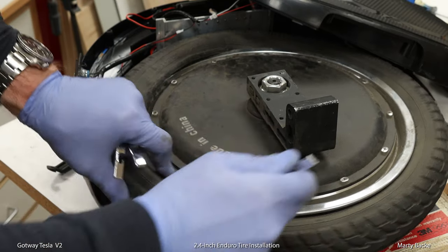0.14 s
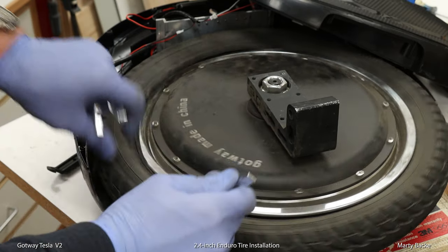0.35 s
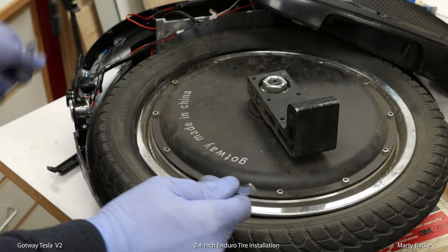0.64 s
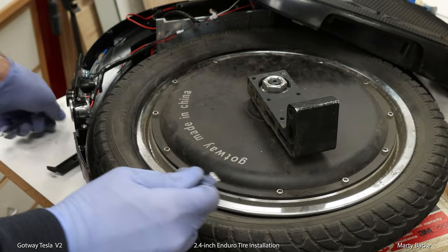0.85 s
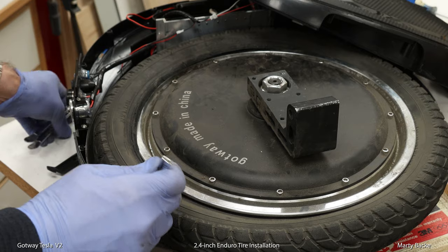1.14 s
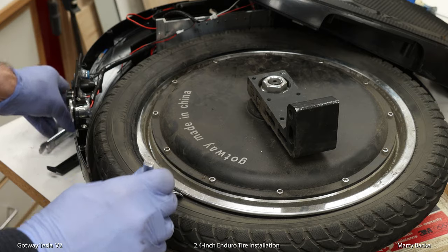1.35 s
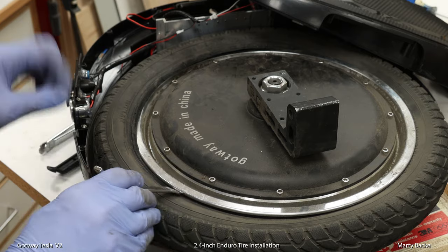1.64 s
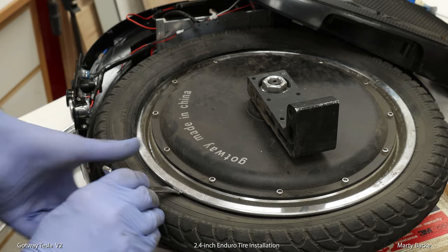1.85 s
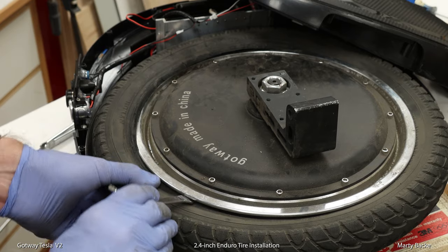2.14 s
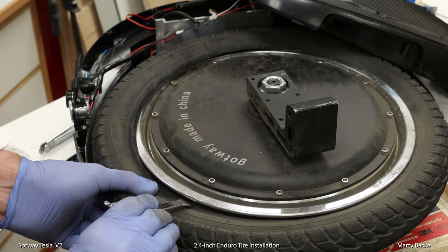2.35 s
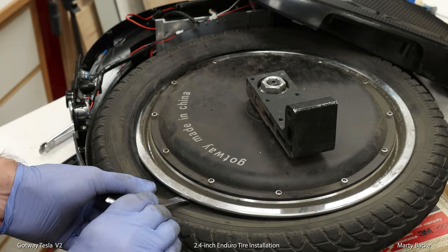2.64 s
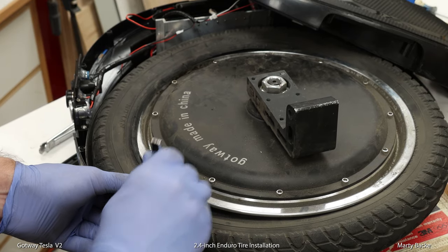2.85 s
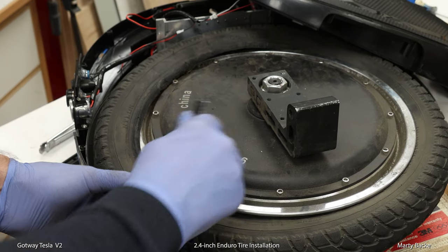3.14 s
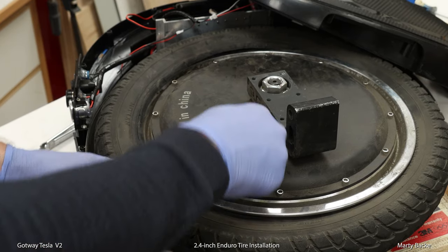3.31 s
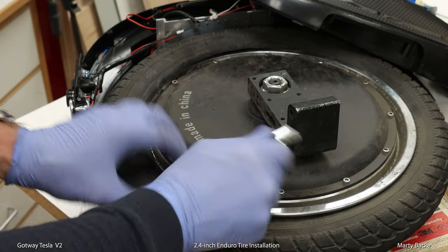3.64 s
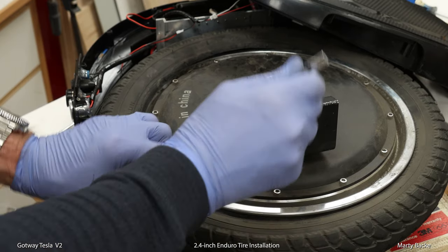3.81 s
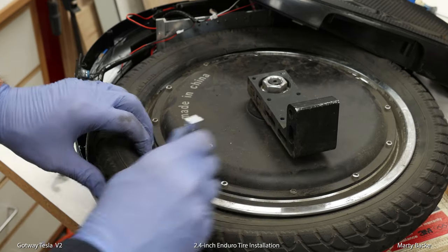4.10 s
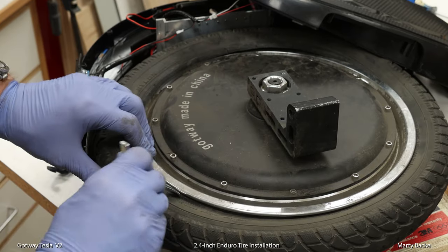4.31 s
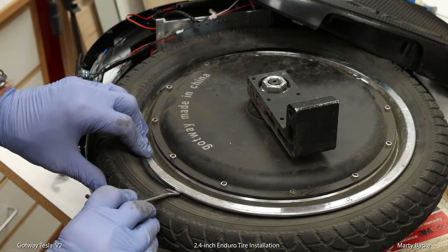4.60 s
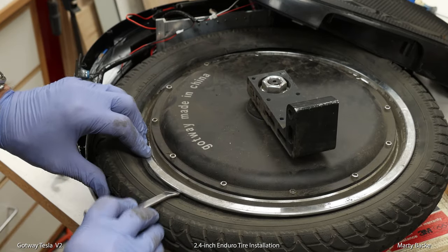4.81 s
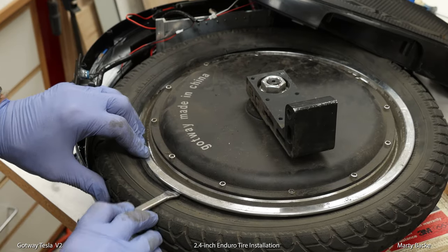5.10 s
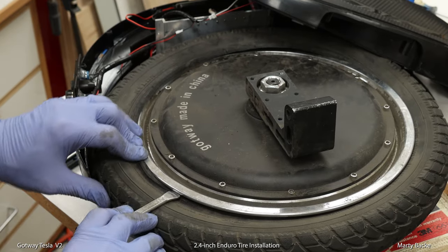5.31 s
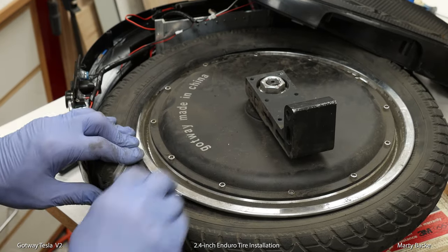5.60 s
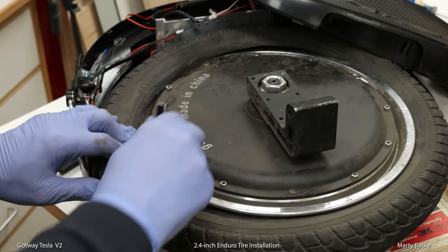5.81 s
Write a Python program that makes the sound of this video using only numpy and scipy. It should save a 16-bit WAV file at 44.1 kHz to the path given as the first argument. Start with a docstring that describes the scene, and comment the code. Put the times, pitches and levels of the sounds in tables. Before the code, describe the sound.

Gloved hands pry a tyre with rubbery creaks and hollow knocks, as metal levers clatter and clink against the rim.

```python
"""A brief rub, a creak and a hollow knock come first: gloved hands pry a tyre off a metal rim on a bench.
Stick-slip friction drives the rubber, glove creases crackle, and the air in the tyre resonates.
Loose steel levers clink, then slide and drop on the board; later a lever strikes the rim. Each impact
excites damped normal modes. The small room hums faintly and reverberates, and slow air pressure
rocks the one close microphone."""
import sys
import numpy as np
from scipy import signal
from scipy.fft import rfft, irfft
from scipy.io import wavfile
from scipy.ndimage import uniform_filter1d

SR = 44100
rng = np.random.default_rng(int(sys.argv[2]) if len(sys.argv) > 2 else 0)


def unload_audio(sound):
    """Save the sound as a 16-bit wav file, at the path given as the first command line argument."""
    columns = np.transpose(np.atleast_2d(sound))
    # keep every value between -1 and 1, then stretch to whole-number steps
    steps = np.round(np.clip(columns, -1, 1) * 32767)
    wavfile.write(sys.argv[1], SR, steps.astype(np.int16))


N = 262836


def undb(db):
    """Amplitude ratio of a level in decibels."""
    return 10 ** (np.asarray(db, float) / 20)


def unit(x):
    """Normalisation to rms 1."""
    return x / np.sqrt(np.mean(x ** 2))


def add(out, s, sound):
    """Superposition: a sound joins the mix at s seconds."""
    i = int(s * SR)
    out[i:i + len(sound)] += sound[:N - i]


def curve(points):
    """Smoothed envelope through (t/s, level/dB) points, silent outside their span."""
    s, db = np.transpose(points)
    return uniform_filter1d(undb(np.interp(np.arange(N) / SR, s, db, -200, -200)), size=200)


def band(x, hz, width_hz):
    """Second-order resonance with unit gain at its centre."""
    q = max(hz / width_hz, .3)
    return signal.lfilter(*signal.iirpeak(min(hz, .45 * SR), q, SR), x)


def steep(x, hz, width_hz):
    """Two equal resonances in cascade: the slopes double."""
    return band(band(x, hz, width_hz), hz, width_hz)


def body(x, peaks):
    """Forced response of a body: a sum of resonances, neighbours in opposite phase."""
    return sum((-1) ** k * undb(db) * band(x, hz, width) for k, (hz, width, db) in enumerate(peaks))


def burst(t60, hz, width_hz, rise_s=0.00085):
    """Transient of band noise: linear rise, exponential decay."""
    t = np.arange(SR // 5) / SR
    noise = unit(steep(rng.standard_normal(len(t)), hz, width_hz))
    return noise * 1000. ** (-t / t60) * np.minimum(t / rise_s, 1)


def stick_slip(rough_db, smear_s):
    """Stick-slip friction: noise in which a few slips are far stronger than the rest."""
    size = undb(rough_db * rng.exponential(1, N // 64 + 1)).repeat(64)[:N]
    return unit(rng.standard_normal(N) * uniform_filter1d(size, int(smear_s * SR)))


def ring(modes, blows, contact_s, scatter_db, rough):
    """Modal response to blows, each partly in step with the mode and partly (share: rough) chatter."""
    t = np.arange(int(contact_s * SR)) / SR
    fade = 1000. ** (-t / contact_s)
    out = np.zeros(N)
    for hz, db, t60, group in modes:
        force = np.zeros(N)
        for s, *blow_db in blows:
            spot, phase = rng.standard_normal(2)  # where a blow lands decides how much a mode gets
            in_step = 2 * np.cos(2 * np.pi * (hz * t + phase)) / np.sum(fade)
            chatter = rng.standard_normal(len(t)) / np.sqrt(np.sum(fade ** 2))
            contact = np.sqrt(1 - rough) * in_step + np.sqrt(rough) * chatter
            add(force, s, undb(db + blow_db[group] + scatter_db * spot) * fade * contact)
        pole = np.exp(2j * np.pi * hz / SR - np.log(1000) / (t60 * SR))
        out += signal.lfilter([1], [1, -pole], force).imag
    return out


def air():
    """Ambient noise: steady room tone and an infrasonic sway of pressure."""
    # spectrum of the room tone: f/Hz, relative density/dB
    spectrum = [(30, -10), (55, 4), (90, -7.5), (200, -7.5), (400, -9), (800, -20), (2000, -27),
                (4000, -31.5), (8000, -35), (16300, -38)]
    # air pressure on the microphone: t/s, level/dB
    sway_levels = [(0.0, -44), (0.13, -39), (0.25, -48), (0.36, -25.5), (0.61, -48), (0.76, -33.5),
                   (0.86, -42.5), (0.93, -41), (0.96, -45), (2.02, -43.5), (2.19, -34.5), (2.31, -44),
                   (5.94, -46), (5.96, -52)]
    bin_hz = np.arange(N // 2 + 1) * SR / N + 1
    hz, db = np.transpose(spectrum)
    shape = undb(np.interp(np.log(bin_hz), np.log(hz), db))
    tone = irfft(rfft(rng.standard_normal(N)) * shape, N)
    sway = unit(steep(rng.standard_normal(N), hz=10, width_hz=15.1))
    return undb(-56) * unit(tone) + curve(sway_levels) * sway


def rubbing():
    """Friction shakes the tyre carcass, rasps along the bead and hisses on the gloves."""
    # strokes: peak t/s, 20 dB rise/s, 20 dB fall/s, carcass level/dB, rasp level/dB, hiss level/dB
    strokes = [(0.035, 0.04, 0.0075, -61, -55, -49.5), (0.421, 0.043, 0.087, -44, -54, -55),
               (0.902, 0.024, 0.15, -59.5, -59.5, -52.5), (1.878, .005, 0.03, -51, -58, -53.5),
               (2.102, 0.09, .04, -53, -71, -67), (3.26, .02, 0.12, -40, -52.5, -77),
               (3.356, 0.041, 0.023, -30.5, -37, -40.5), (3.49, 0.013, 0.036, -41, -50, -52),
               (3.544, 0.028, 0.077, -47.5, -60, -57), (3.641, 0.0069, 0.14, -41.5, -50, -61),
               (3.802, 0.021, 0.3, -52.5, -59, -66), (4.002, 0.032, 0.077, -44.5, -47.5, -79),
               (4.157, 0.014, 0.12, -31.5, -36.5, -82), (4.215, 0.05, 0.06, -25.5, -27.5, -46.5),
               (5.308, .04, 0.05, -52, -76, -88), (5.57, 0.21, 0.044, -55.5, -64, -68),
               (5.678, 0.054, 0.02, -57, -82, -59.5), (5.742, 0.0073, 0.13, -54, -50, -53),
               (5.789, 0.037, 0.027, -50.5, -47, -51.5), (5.836, 0.019, 0.02, -72, -74, -53)]
    # tyre resonances: f/Hz, width/Hz, gain/dB
    tyre_modes = [(164, 41, -11), (408, 110, -0.5), (710, 270, -5.5), (890, 340, -9.5), (1226, 383, 0.5),
                  (1692, 660, 0), (2035, 1080, -3), (3234, 140, -7), (4530, 710, -13)]
    t = np.arange(N) / SR
    gains = undb([-80, -69, -70.5])[:, None] * ((t > 0.12) & (t < 0.88))  # the hands fidget
    for s, rise_s, fall_s, *db in strokes:
        from_peak = np.where(t < s, (s - t) / rise_s, (t - s) / fall_s)
        gains += undb(db)[:, None] * undb(-20 * from_peak)
    low_modes = [mode for mode in tyre_modes if mode[0] < 800]
    high_modes = [mode for mode in tyre_modes if mode[0] >= 800]
    slips = stick_slip(rough_db=2.28, smear_s=0.004)
    carcass = body(slips, low_modes)
    rasp = band(body(slips, high_modes), 1460, 6000)
    hiss = steep(stick_slip(rough_db=2, smear_s=.003), 7100, 10200)
    return sum(unit(layer) * gain for layer, gain in zip([carcass, rasp, hiss], gains))


def bead_creaks():
    """Heavy damping keeps a creak of rubber dull: the bead rasps, the tyre thuds and a scuff trails."""
    # creaks: t/s, thud level/dB, rasp level/dB, thud f/Hz, thud width/Hz
    creaks = [(0.036, -43, -31, 497, 447), (0.396, -41, -41, 383, 337), (1.703, -26, -14.5, 492, 150),
              (1.875, -40, -28, 220, 198), (2.152, -44.5, -29, 181, 160.4), (2.433, -29.5, -46, 767, 887),
              (2.549, -43, -25, 800, 900), (2.559, -28.5, -14.5, 610, 600), (2.841, -39.5, -55, 670, 606),
              (3.018, -30, -26, 780, 970), (3.226, -31, -39, 720, 710), (3.356, -27, -21.5, 207, 186),
              (3.483, -48, -39, 385, 350), (3.624, -33.5, -24.5, 607, 526), (3.75, -28.5, -19, 313, 365),
              (3.99, -31, -20.5, 750, 746), (4.35, -37, -33, 524, 397), (4.733, -36, -13.5, 665, 595),
              (5.002, -38, -47, 316, 309), (5.128, -46.5, -68, 332, 318), (5.219, -36.5, -33.5, 807, 760),
              (5.295, -43.5, -52.5, 383, 348), (5.414, -40, -44.5, 626, 590), (5.527, -44, -44, 382, 344),
              (5.58, -35.5, -24, 780, 760)]
    out = np.zeros(N)
    for s, thud_db, rasp_db, hz, width_hz in creaks:
        scuff_db = min(thud_db, rasp_db + 2.5) - 15.5
        add(out, s, undb(thud_db) * burst(0.075, hz, width_hz, rise_s=0.0019))
        add(out, s, undb(rasp_db) * burst(0.008, 1240, 2000, rise_s=.003))
        add(out, s, undb(scuff_db) * burst(0.17, 1570, 1700, rise_s=.012))
    return out


def tyre_knocks():
    """Cavity resonance: the air in the tyre swings a few times and dies away."""
    # hollow knocks: t/s, initial level/dB, f/Hz
    knocks = [(0.038, -32, 315), (0.398, -30.5, 395), (1.706, -22, 490), (2.556, -25, 330),
              (3.356, -22, 200), (3.752, -15, 473), (4.154, -36, 400), (4.182, -41, 400),
              (4.221, -15.5, 407), (4.256, -44, 423), (4.285, -44, 447), (4.349, -17, 510),
              (5.295, -36, 386), (5.526, -42, 386)]
    t60_cycles = 5.7
    out, t = np.zeros(N), np.arange(SR // 10) / SR
    for s, db, hz in knocks:
        add(out, s, undb(db - 60 * t * hz / t60_cycles) * np.sin(2 * np.pi * hz * t))
    return out


def lever_clinks():
    """Free vibration of steel bars: four loose levers rattle and ring at each touch."""
    # lever modes: f/Hz, level/dB, t60/s, lever index
    lever_modes = [(4517, -1, .1, 0), (8615, 0, .11, 0), (13490, -2, .1, 0), (5803, 0, .24, 1),
                   (9615, -1, .32, 1), (3050, -4, .1, 2), (4506, -5, .2, 2), (8768, 0, .13, 2),
                   (12090, -1, .16, 2), (5916, 0, .12, 3), (9815, 0, .15, 3), (13800, -10, .08, 3)]
    # touches: t/s, then drive level/dB for each of the four levers
    touches = [(0.052, -41, -75, -54, -72), (0.679, -49.5, -66, -62, -70), (0.821, -65, -64, -60, -66),
               (0.8896, -50, -52.5, -58, -57.5), (0.9178, -48.5, -51.5, -54, -48),
               (0.9704, -40.5, -36.5, -43, -44), (1.0333, -36.5, -28.5, -46.5, -34.5),
               (1.0663, -32, -41.5, -44, -47), (1.1246, -36.5, -37, -46.5, -41),
               (1.1542, -30, -36.5, -47.5, -37), (1.211, -43.5, -32, -39.5, -39),
               (1.229, -41, -40, -40.5, -44), (1.2888, -41, -44.5, -54, -37.5),
               (1.3282, -31.5, -33, -41.5, -38), (1.3826, -22, -22.5, -23, -30.5),
               (1.4114, -27, -26.5, -17.5, -38), (1.4512, -28.5, -24.5, -24.5, -34),
               (1.5022, -33, -22, -32, -39), (1.5546, -53, -25, -28.5, -40), (1.6142, -46, -35.5, -35, -52)]
    return ring(lever_modes, touches, contact_s=.12, scatter_db=1.5, rough=.3)


def glove_crackle():
    """A short pulse has a broad spectrum: each crease of a glove gives one tick."""
    # creases: t/s, level/dB, centre f/Hz
    creases = [(0.1508, -41.5, 4450), (0.193, -45, 4800), (0.2313, -38.5, 4870), (0.253, -53, 4760),
               (0.28, -45.5, 4880), (0.2999, -45, 3100), (0.32, -44, 3050), (0.3548, -48, 3150),
               (0.3932, -43, 4280), (0.4346, -34.5, 8360), (0.481, -34.5, 4860), (0.514, -36, 7300),
               (0.5645, -36, 4970), (0.59, -33.5, 6500), (0.6331, -45, 7760), (0.645, -39, 5500),
               (0.656, -34, 5640), (0.6803, -28, 8800), (1.877, -32, 7420)]
    out = np.zeros(N)
    for s, db, hz in creases:
        add(out, s, undb(db) * burst(0.0044, hz, 5700, rise_s=0.00037))
    return out


def levers_on_bench():
    """Forced vibration: sliding and dropping levers drive the board; the steel adds grit and cracks."""
    # drops and bounces: t/s, blow level/dB, crack level relative to the blow/dB
    drops = [(1.014, -22.5, -29), (1.105, -22, -25.5), (1.381, -17.5, -17.5), (1.412, -6, -20.5),
             (1.449, -5.5, -25.5), (1.498, -10, -17), (1.505, -9.5, -22), (1.544, -9.5, -24),
             (1.555, -21.5, -13.5), (1.613, -20.5, -45)]
    # sliding: t/s, level/dB
    slide_levels = [(1.0, -66.5), (1.016, -39.5), (1.104, -40), (1.368, -44.5), (1.39, -28.5), (1.45, -25),
                    (1.626, -32.5), (1.674, -38), (1.8, -76)]
    # board resonances: f/Hz, width/Hz, gain/dB
    board_modes = [(178, 58, -7.5), (337, 65, 1), (710.5, 83, 4), (939, 33, 7), (1285, 160, -6.5),
                   (1715, 34, -0.5), (1863, 44, -3.5), (2420, 83, -1), (2733, 70, 0.5), (3142, 270, -1.5),
                   (3870, 18, -16.5)]
    blows, cracks = np.zeros(N), np.zeros(N)
    for s, db, crack_db in drops:
        add(blows, s, undb(db) * burst(0.017, 1600, 5000))
        add(cracks, s, undb(db + crack_db) * burst(0.0091, 7000, 7000))
    chatter = stick_slip(rough_db=2.0, smear_s=0.0022)
    board = unit(body(chatter, board_modes)) + undb(-3.5) * unit(steep(chatter, 1500, 1700))
    grit = undb(-11) * unit(steep(chatter, 5500, 4900))
    sliding = curve(slide_levels) * (board + grit)
    return sliding + undb(7) * body(blows, board_modes) + undb(-4) * blows + cracks


def rim_strikes():
    """Mode splitting: tyre and bolts make the struck rim ring in uneven pairs, under a crack of steel."""
    # rim modes: f/Hz, level/dB, t60/s, group (0 lowest two, 1 next two, 2 upper modes)
    rim_modes = [(1657, 8, 0.046, 0), (1892, -3, 0.097, 0), (2220, 4, 0.094, 1), (2610, -8, 0.08, 1),
                 (3267, 5, 0.036, 2), (3470, -6.5, 0.12, 2), (4260, 5.5, 0.055, 2), (4374, -10, 0.095, 2),
                 (4830, -16.5, 0.053, 2), (5160, -18, 0.05, 2), (5820, -2, 0.044, 2), (6130, -1, 0.047, 2),
                 (6500, 2, 0.02, 2), (6840, 3, 0.032, 2), (7960, -10, 0.058, 2), (7860, -1, 0.058, 2),
                 (9030, -19, 0.043, 2), (9900, -11, 0.031, 2), (13500, -31, 0.039, 2), (13900, -29, .05, 2)]
    # lever blows: t/s, then drive level/dB for each of the three groups
    strikes = [(1.8799, -60, -75, -75), (2.154, -48, -46, -48.5), (2.562, -39.5, -41, -29),
               (2.8419, -44.5, -40, -40), (3.305, -43, -51, -54.5), (3.3568, -63, -63, -44),
               (3.529, -51.5, -48, -81), (3.7541, -33, -58, -43), (3.861, -51, -54, -59),
               (4.7336, -30, -29.5, -26), (5.476, -61, -67, -68), (5.5802, -45, -50, -52),
               (5.7334, -57, -55, -63), (5.788, -44.5, -47.5, -70)]
    split, twin_db = .022, -4
    twins = [(hz * (1 + split * (-1) ** k), db + twin_db, t60, group)
             for k, (hz, db, t60, group) in enumerate(rim_modes)]
    out = ring(rim_modes + twins, strikes, contact_s=0.02, scatter_db=1.9, rough=0.38)
    for s, _, middle_db, upper_db in strikes:
        crack = burst(0.025, 5760, 3500) + burst(0.013, 6400, 8900)
        add(out, s, undb(upper_db + 9) * crack)
        add(out, s, undb(middle_db + 1) * burst(0.044, 1990, 1330))
    return out


def room(x):
    """Reverberation: a diffuse tail builds up, then decays, the treble sooner."""
    low_t60_s, treble_t60_s, build_s = 0.39, 0.28, 0.031
    t = np.arange(int(.8 * SR)) / SR
    noise = rng.standard_normal(len(t))
    low = signal.lfilter(*signal.butter(1, 4000, fs=SR), noise)
    tail = low * 1000. ** (-t / low_t60_s) + (noise - low) * 1000. ** (-t / treble_t60_s)
    tail *= np.minimum(t / build_s, 1)
    tail /= np.sqrt(np.sum(tail ** 2))
    return x + undb(-10) * signal.fftconvolve(x, tail)[:N]


def scene():
    """Superposition of all sources; a faint delayed copy and hiss enter the channels in opposite phase."""
    steel = lever_clinks() + levers_on_bench() + rim_strikes()
    rubber = bead_creaks() + tyre_knocks() + rubbing()
    mono = room(steel + rubber + glove_crackle()) + air()
    side = undb(-49.0) * np.roll(mono, 40) + undb(-72) * rng.standard_normal(N)
    return mono + side * np.array([[1], [-1]])


def record(dry):
    """Band limiting: a steep low-pass cuts the treble above 16 kHz."""
    return signal.sosfilt(signal.ellip(10, .2, 95, 16000, fs=SR, output="sos"), dry)


dry = scene()
out = record(dry)
unload_audio(out)
```